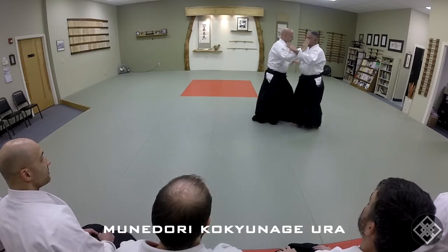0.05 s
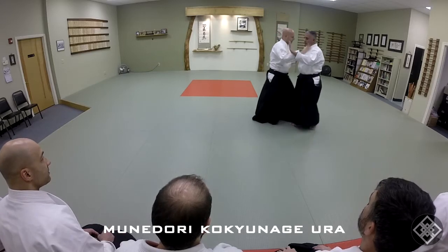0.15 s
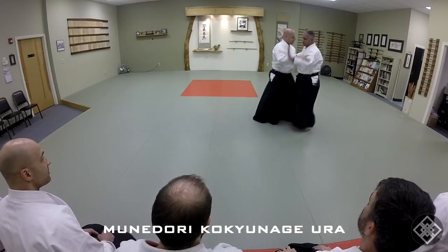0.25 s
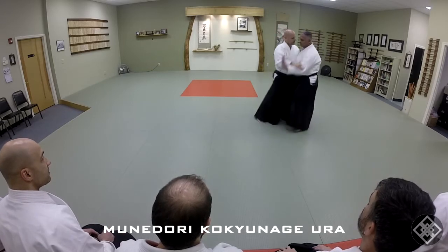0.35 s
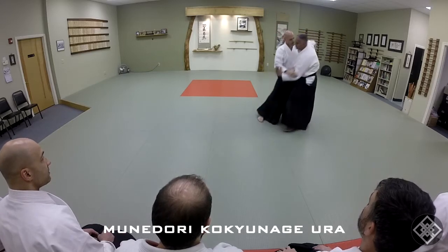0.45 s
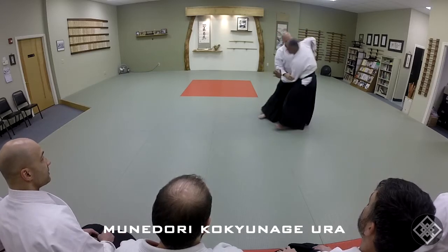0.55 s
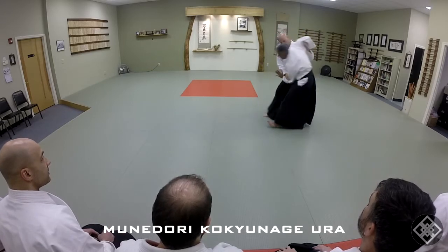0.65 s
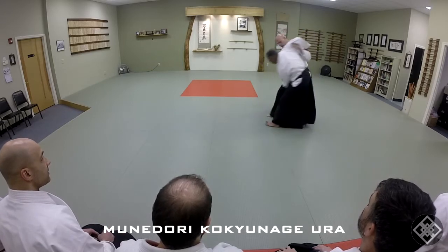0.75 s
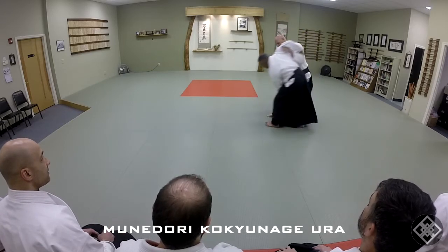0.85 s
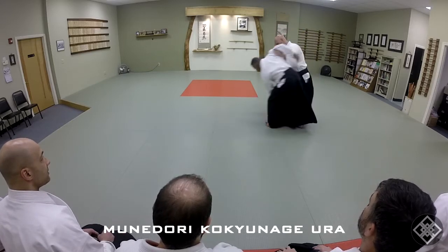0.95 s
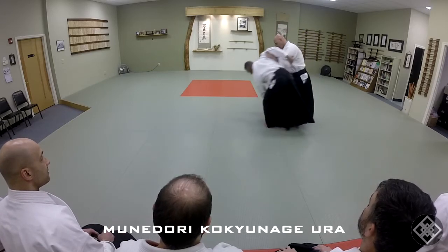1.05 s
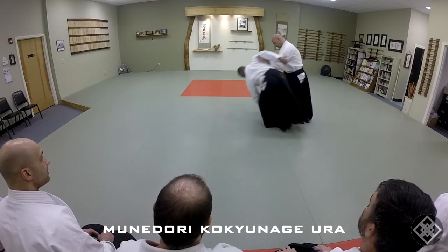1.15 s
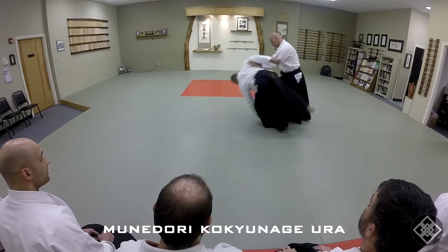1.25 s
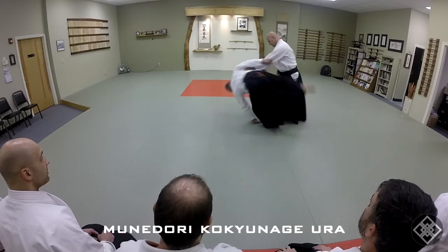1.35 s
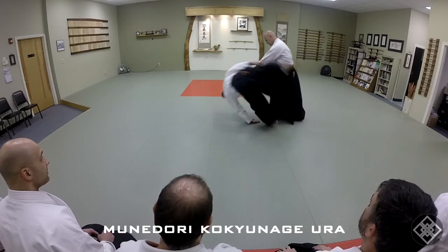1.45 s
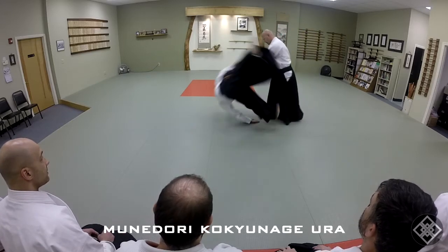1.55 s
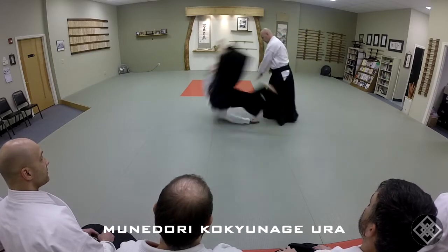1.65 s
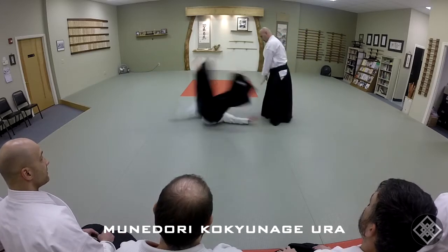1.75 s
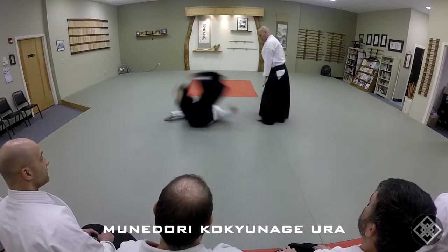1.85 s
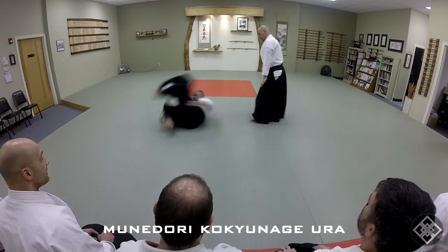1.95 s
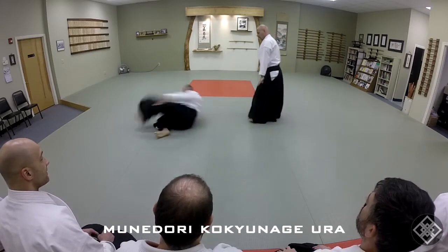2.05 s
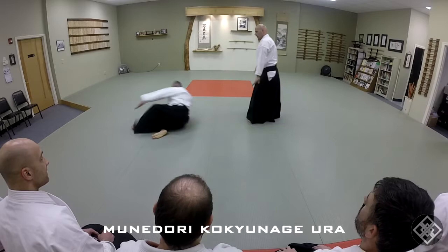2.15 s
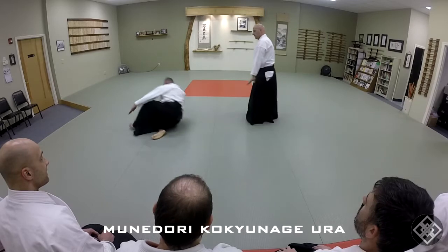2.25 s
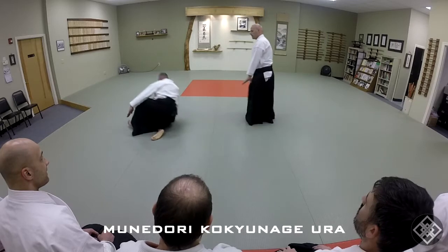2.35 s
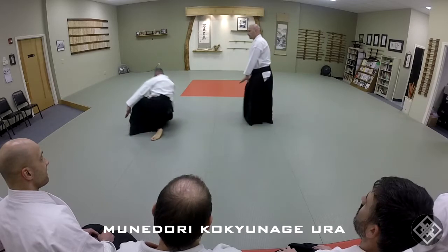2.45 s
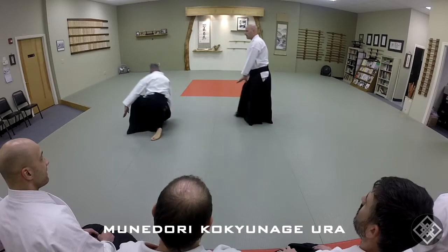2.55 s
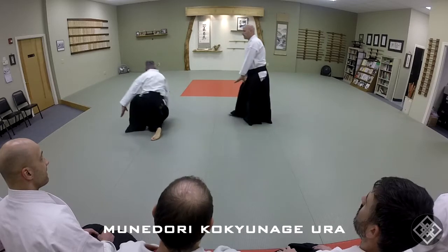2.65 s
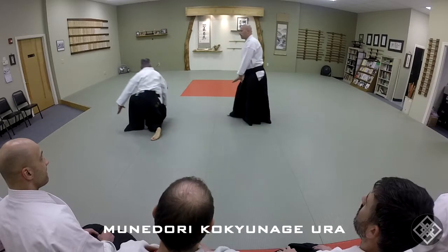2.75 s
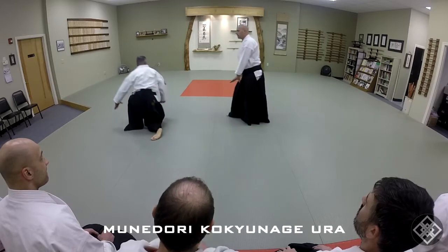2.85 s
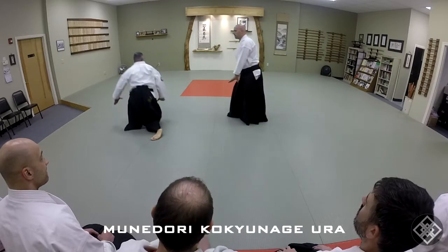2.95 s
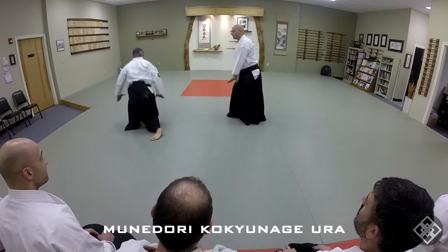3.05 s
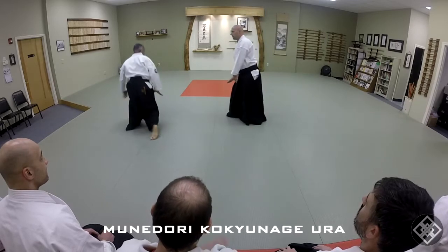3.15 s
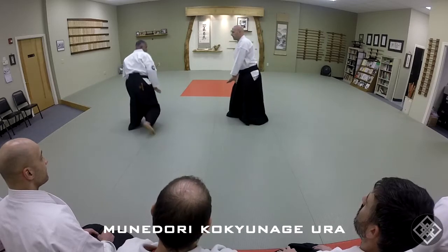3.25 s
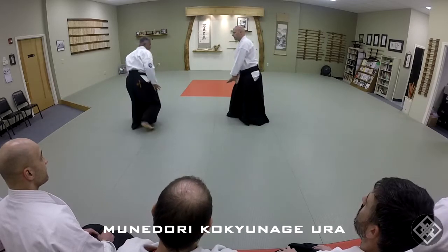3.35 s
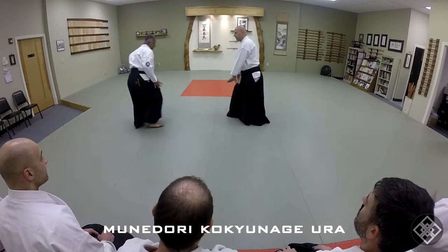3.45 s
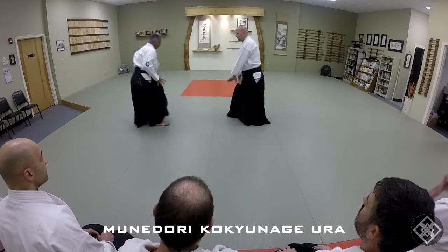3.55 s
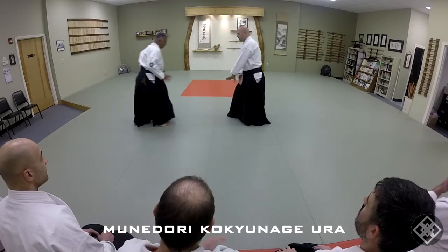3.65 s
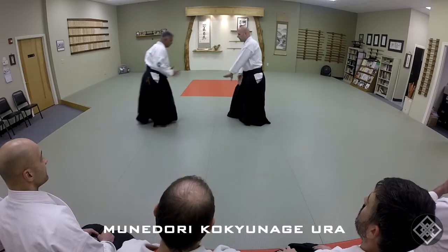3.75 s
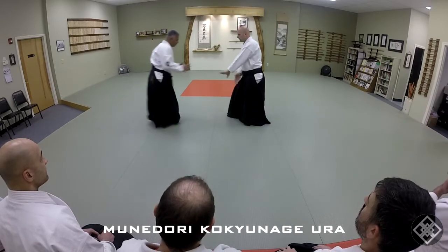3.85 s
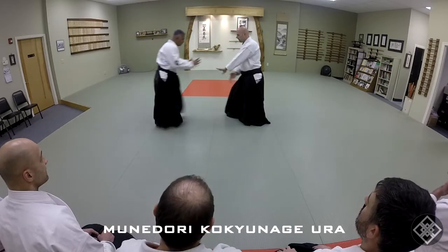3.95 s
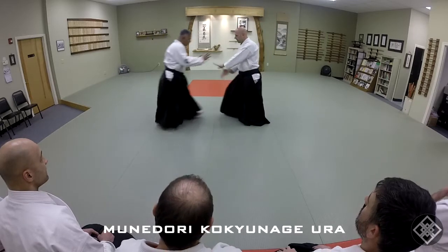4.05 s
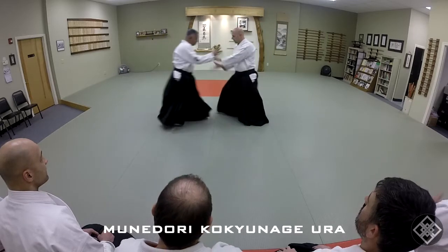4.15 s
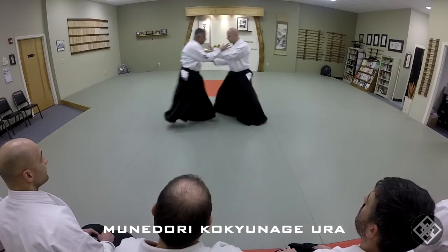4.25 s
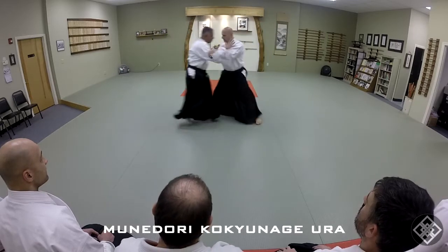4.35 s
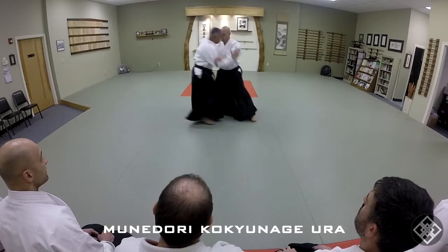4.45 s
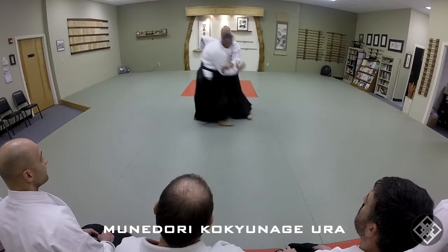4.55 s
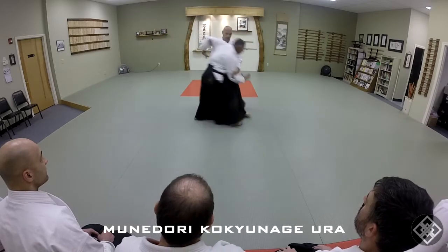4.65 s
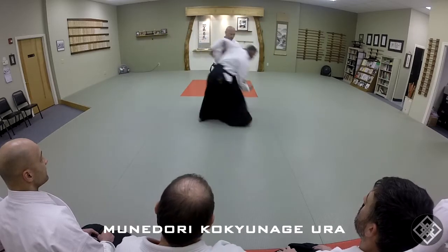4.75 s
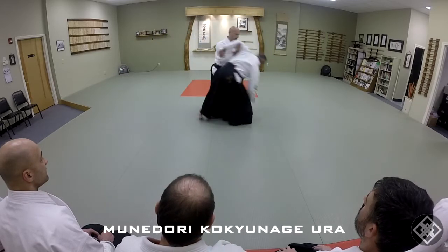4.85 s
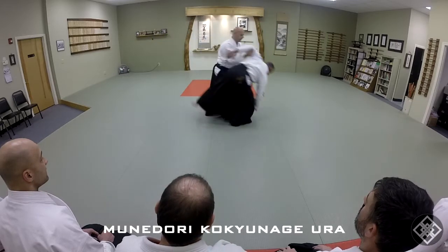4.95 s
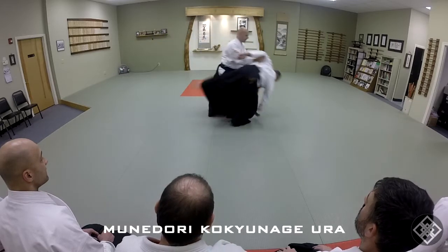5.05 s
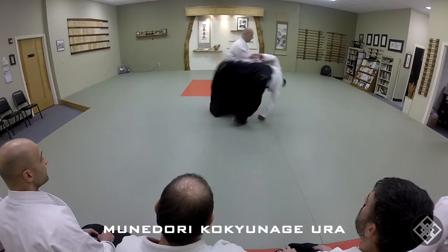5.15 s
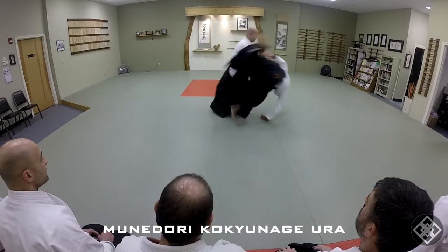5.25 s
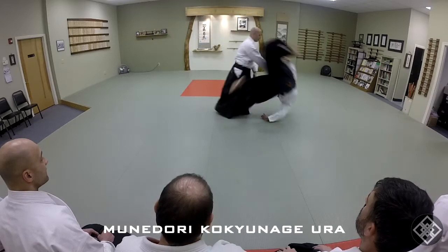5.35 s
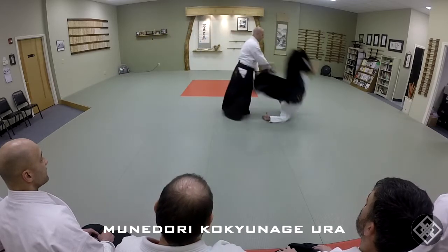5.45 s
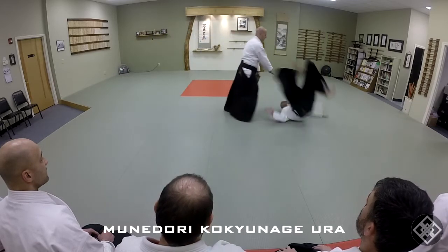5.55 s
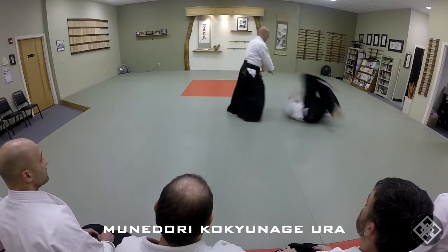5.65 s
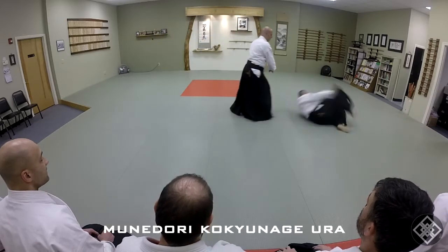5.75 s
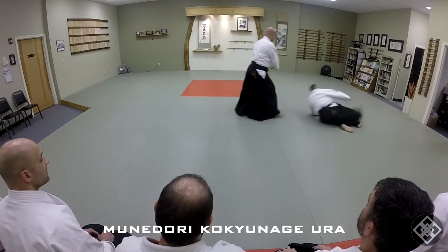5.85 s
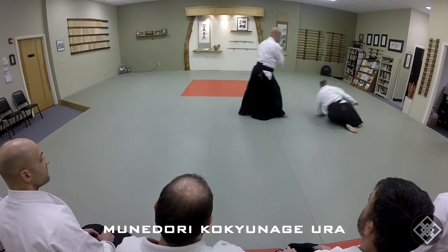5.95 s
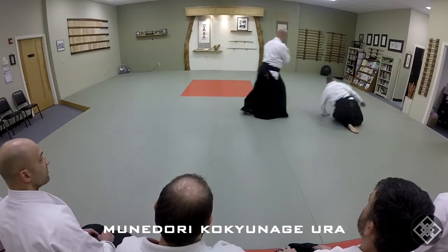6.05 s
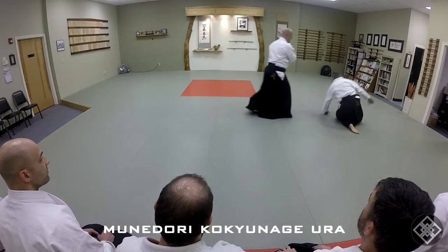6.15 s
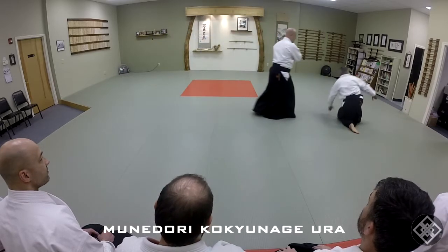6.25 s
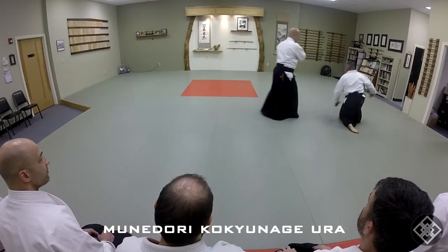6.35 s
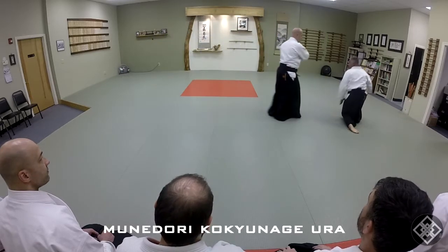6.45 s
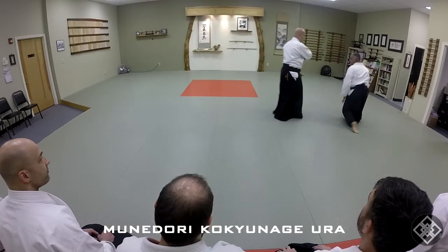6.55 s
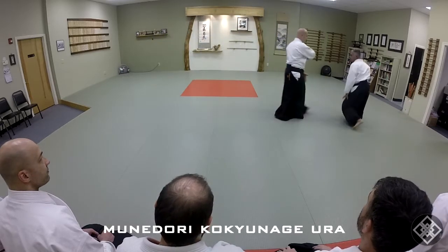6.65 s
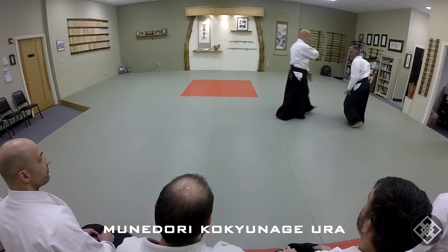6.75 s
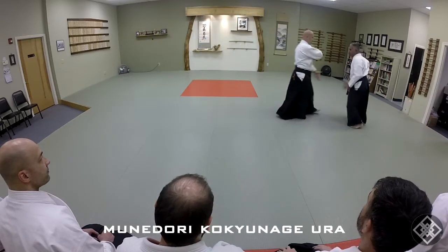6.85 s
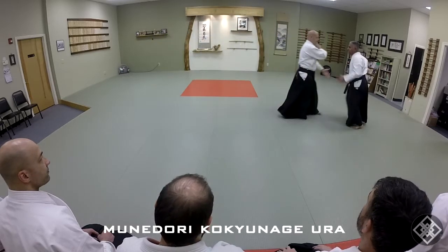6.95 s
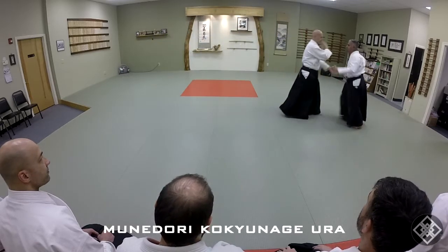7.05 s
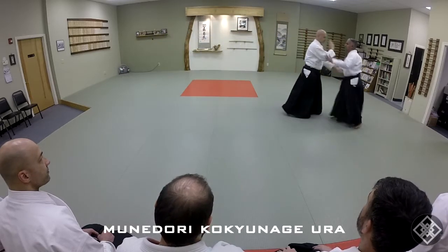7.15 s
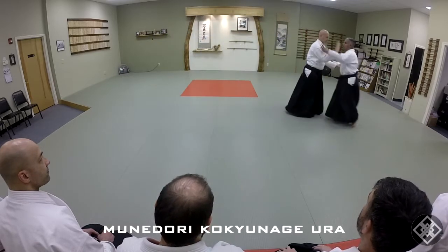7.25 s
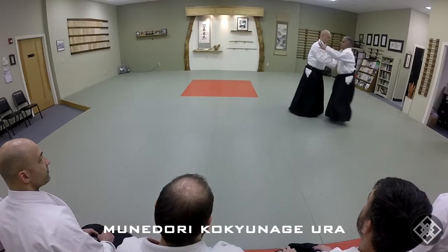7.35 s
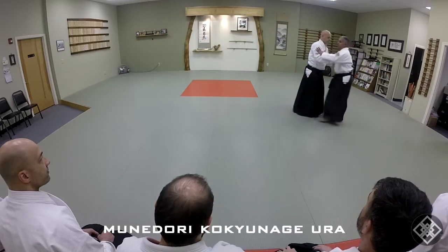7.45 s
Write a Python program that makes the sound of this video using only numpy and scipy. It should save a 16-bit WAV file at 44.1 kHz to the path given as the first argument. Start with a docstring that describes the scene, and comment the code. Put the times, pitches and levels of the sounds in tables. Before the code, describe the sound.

Two heavy falls thud on a training mat and roll out, amid hand grabs, barefoot scuffs and low ventilation noise.

```python
"""Two throws in a martial arts hall

A few metres from the microphone, a body slaps onto a padded mat and rolls out; the sprung floor booms.
Between the falls bare feet scuff, cotton jackets rustle and hands grab, over the ventilation.
The hall rings for under a second, and both landings overload the microphone."""
import sys
import numpy as np
from scipy import signal
from scipy.fft import rfft, irfft, next_fast_len
from scipy.io import wavfile

SR = 44100
rng = np.random.default_rng(int(sys.argv[2]) if len(sys.argv) > 2 else 0)


def to_wav(s):
    """Save 16-bit WAV."""
    ch = np.atleast_2d(s).T  # columns
    pcm = np.round(np.clip(ch, -1, 1) * 32767)  # PCM
    wavfile.write(sys.argv[1], SR, pcm.astype(np.int16))


N = 330249
TIME = np.arange(N) / SR

# air squeezed from under the mat cover: (frequency [Hz], relative level [dB])
MAT_AIR_SPECTRUM = [(60, -18), (150, 0.5), (250, -6), (330, 4), (400, -2.5), (490, -1), (660, -3.5),
                    (1000, -11), (1500, -13.5), (2500, -25.5), (5000, -32), (9000, -46), (15000, -83)]
# a thrown body lands: (time [s], thud [dB], contact [s], slap [dB], crack [dB], first gap between body
# parts [s], slap and crack lost per part [dB], roll-out thud [dB], dip in the room tone [dB])
LANDINGS = [(1.8636, -7.5, 0.0028, 1.5, -9, .0098, 1.15, -18.5, -6),
            (5.659, 1, 0.0039, 2, -2, .0098, 4, -9, -1.5)]


def from_db(db):
    """Decibels to gain."""
    return 10 ** (np.asarray(db) / 20)


def at_hz(points, hz):
    """Read a table on a log-frequency axis."""
    known_hz, values = np.transpose(points)
    return np.interp(np.log(np.maximum(hz, 1)), np.log(known_hz), values)


def coloured(x, spectrum):
    """Give a steady signal a spectrum; rms 1."""
    size = next_fast_len(N)
    gain = from_db(at_hz(spectrum, np.arange(size // 2 + 1) * SR / size))
    shaped = irfft(rfft(x, size) * gain, size)[:N]
    return shaped / shaped.std()


def noise(spectrum):
    """Smooth noise of a given colour; rms 1."""
    return coloured(rng.standard_normal(N), spectrum)


def ring(force, hz, t60):
    """One resonance: a unit impulse starts a sine of height 1 that falls 60 dB in t60 seconds."""
    radius, angle = from_db(-60 / (t60 * SR)), 2 * np.pi * hz / SR
    return signal.lfilter([0, np.sin(angle)], [1, -2 * radius * np.cos(angle), radius ** 2], force + 1e-18)


def burst(attack_s, decay_s):
    """A quick rise and an exponential fall."""
    t = TIME[:SR // 2]
    return (1 - np.exp(-t / attack_s)) * np.exp(-t / decay_s)


def add(track, s, piece):
    """Mix a piece into a track from time s."""
    start = int(s * SR)
    track[start:start + len(piece)] += piece[:max(N - start, 0)]


def ventilation(air_db, drone_db, hum_db):
    """Room tone: a fan hums and drones in its duct, with rumble and hiss; it dips after each fall."""
    # moving air in the hall: (frequency [Hz], relative level [dB])
    air_spectrum = [(15, -25), (28, -3.5), (43, -5.5), (58, -1), (80, -7), (125, -7), (200, -10.5),
                    (270, -11.5), (380, -10.5), (750, -14.5), (1100, -19.5), (2500, -29), (6000, -37),
                    (10000, -46.5), (15000, -51), (16000, -65)]
    # the fan motor: (frequency [Hz], relative level [dB])
    motor_tones = [(59.2, -37.5)]
    drone = ring(rng.standard_normal(N), hz=57.6, t60=0.96)
    hum = sum(from_db(db) * np.sqrt(2) * np.sin(2 * np.pi * (hz * TIME + rng.random()))
              for hz, db in motor_tones)
    air = from_db(air_db) * noise(air_spectrum)
    delay_s, half_s = 0.59, 0.24
    dips_db = sum(db * np.exp(-((TIME - s - delay_s) / half_s) ** 2) for s, *_, db in LANDINGS)
    return from_db(dips_db) * (air + from_db(drone_db) * drone / drone.std() + from_db(hum_db) * hum)


def hall(x, build_up_s):
    """In each half octave, energy builds up in the hall and dies away as a wash of countless echoes."""
    # the hall's reverberation: (frequency [Hz], time to fall 60 dB [s])
    decay_times = [(50, 0.85), (150, 0.81), (400, 0.8), (1000, 0.3), (4000, 0.58), (12000, 0.27)]
    echoes, white = np.zeros(N), rng.standard_normal((2, N))
    edges_hz = 28 * 2 ** (np.arange(20) / 2)
    rise = np.exp(-1 / (build_up_s * SR))
    for k, (low, high) in enumerate(zip(edges_hz, edges_hz[1:])):
        band = signal.butter(2, [low, high], "band", fs=SR, output="sos")
        t60 = at_hz(decay_times, np.sqrt(low * high))
        fall = from_db(-60 / (t60 * SR)) ** 2   # squared for energy
        power = signal.sosfilt(band, x) ** 2 + 1e-18
        energy = signal.lfilter([(1 - rise) * (1 - fall)], [1, -rise - fall, rise * fall], power)
        wash = signal.sosfilt(band, white[k % 2])
        echoes += np.sqrt(np.abs(energy)) * wash / wash.std()
    return echoes


def grappling_effort(rise_db_per_s=4.5, edge_s=0.05, uneven_db=1, tugs_per_s=7):
    """The pair close in and wrestle; each bout builds in uneven tugs."""
    # bouts of wrestling: (start [s], end [s], effort at the end [dB])
    grapples = [(0.706, 2.2, -35.5), (3.87, 6.0, -36), (6.3, 7.598, -40)]
    build = np.zeros(N)
    for start, end, db in grapples:
        fade = np.clip(np.minimum(TIME - start, end - TIME) / edge_s, 0, 1)
        build += fade * from_db(db + rise_db_per_s * (TIME - end))
    tugs_db = uneven_db * rng.standard_normal(200)
    return build * from_db(np.interp(TIME * tugs_per_s, np.arange(len(tugs_db)), tugs_db))


def strokes(rows):
    """Sliding speed that swells and fades with each stroke."""
    return sum(from_db(db) * np.exp(-np.minimum(((TIME - s) / half_s) ** 2, 20)) for s, half_s, db in rows)


def rubbing(speed, spectrum, slips_per_s, spread_db):
    """Dense tiny slips of uneven size, as loud as the sliding is fast."""
    sizes = from_db(spread_db * np.minimum(rng.exponential(1, N), 5)) * rng.choice([-1, 1], N)
    slips = sizes * (rng.random(N) < slips_per_s / SR)
    return speed * coloured(slips, spectrum)


def jackets(effort, rustle_db=-16):
    """Cotton rubs on cotton: a rustle that follows the effort, a swish with each wide swing."""
    # swings of a jacket or trouser leg, and a soft slide of a foot near 4.1 s: (middle [s], half length [s],
    # level [dB])
    swishes = [(.055, 0.011, -45), (.79, .07, -48), (1.47, 0.12, -48), (2.11, 0.016, -35.5),
               (2.64, 0.082, -52), (3.59, 0.062, -43.5), (4.12, 0.096, -49), (4.2, 0.0027, -34.5),
               (4.36, 0.065, -45.5), (4.73, 0.14, -52), (5.30, 0.035, -47), (5.835, 0.013, -30),
               (5.93, 0.015, -28.5), (6.36, 0.071, -53), (7.215, 0.019, -37)]
    # rubbing cotton: (frequency [Hz], relative level [dB])
    cotton_spectrum = [(300, 14.5), (1500, 7.5), (3000, 7.5), (6000, 2.5), (9000, -4.5), (13000, -8.5),
                       (15000, -21)]
    speed = strokes(swishes) + from_db(rustle_db) * effort
    return rubbing(speed, cotton_spectrum, slips_per_s=3500, spread_db=1.5)


def bare_feet(effort, shuffle_db=-3):
    """Soles rasp across the cover, and shifting weight presses air from the mat."""
    # sliding soles: (middle [s], half length [s], level [dB])
    scuffs = [(3.284, 0.013, -34), (3.310, 0.0093, -48), (3.341, 0.019, -29), (3.372, 0.012, -49),
              (4.06, 0.027, -48), (4.135, 0.028, -60), (6.677, 0.0074, -38.5), (6.712, 0.024, -36.5)]
    # skin rasping on the cover: (frequency [Hz], relative level [dB])
    sole_spectrum = [(500, -49), (1100, 0), (1700, 8), (3500, 5.5), (7500, 1), (10000, -14), (15000, -15)]
    rasp = rubbing(strokes(scuffs), sole_spectrum, slips_per_s=2400, spread_db=1.1)
    return rasp + from_db(shuffle_db) * effort * noise(MAT_AIR_SPECTRUM)


def hand_grabs():
    """A cupped palm on cloth gives a short, hollow smack with no bass."""
    # hands catching arms and thick cotton: (time [s], level [dB], decay [s])
    grabs = [(4.33, -29, 0.022), (4.4077, -14, 0.0081), (5.561, -26, 0.038), (7.242, -33, 0.0064),
             (7.402, -23.5, 0.0069)]
    # the hollow of the palm: (frequency [Hz], relative level [dB])
    palm_spectrum = [(150, -22), (330, 7), (550, 7.5), (1050, 9.5), (1450, -2.5), (1800, -5), (3000, -18),
                     (6000, -19), (9000, -42), (14000, -54)]
    smack = np.zeros(N)
    for s, db, decay_s in grabs:
        add(smack, s, from_db(db) * burst(attack_s=0.00081, decay_s=decay_s))
    return smack * noise(palm_spectrum)


def mat_contacts():
    """Every blow on the mat, in the columns of touches plus (slap decay [s], crack decay [s])."""
    # a hand, knee or foot comes down: (time [s], thud [dB], contact [s], slap [dB], crack [dB])
    touches = [ (1.7677, -44, 0.0042, -16, -30), (1.781, -16, 0.0026, -16, -58),
               (1.837, -24, .004, -18, -20), (2.185, -23, 0.0059, -37, -48),
               (2.208, -24, 0.0026, -24, -14.5), (2.24, -29, 0.0076, -23.5, -28),
               (5.46, -43, 0.0035, -29, -50), (5.59, -16.5, 0.0073, -16, -56),
               (5.6387, -14, 0.0031, -18.5, -25), (5.823, -6.5, 0.0075, -16.5, -28),
               (5.917, -6.5, .010, -19.5, -26), (5.96, -11, 0.007, -21, -32),
               (7.245, -23.5, 0.0093, -38, -42)]
    landing_decays_s, roll_decays_s, touch_decays_s = (0.0086, 0.0029), (0.028, 0.0012), (0.013, 0.0012)
    thud_loss_db, slowing = 1.75, 1.2
    roll_start_s, roll_gap_s, roll_uneven_s = 0.095, 0.053, 0.0053
    roll_loss_db, roll_contact_s, slap_under_thud_db = 1.37, 0.0075, 11.5
    rows = []
    for s, thud_db, contact_s, slap_db, crack_db, gap_s, loss_db, roll_db, _ in LANDINGS:
        for k in range(4):   # arm, shoulder, back and hip land in turn, weaker and ever further apart
            rows.append((s + gap_s * k ** slowing, thud_db - k * thud_loss_db, contact_s,
                         slap_db - k * loss_db, crack_db - k * loss_db, *landing_decays_s))
        for k in range(6):   # the body rolls out in soft, fading bumps with no crack
            bump_s = s + roll_start_s + k * roll_gap_s + roll_uneven_s * rng.standard_normal()
            bump_db = roll_db - k * roll_loss_db
            rows.append((bump_s, bump_db, roll_contact_s,
                         bump_db - slap_under_thud_db, -np.inf, *roll_decays_s))
    return rows + [(*touch, *touch_decays_s) for touch in touches]


def floor_boom(contacts, radiation_hz=40):
    """Each weight pushes the floor for a moment; a long, soft push reaches only the lowest modes."""
    # the sprung floor: (frequency [Hz], relative level [dB], time to fall 60 dB [s])
    floor_modes = [(34.6, -10.5, 1), (55, -25, 0.31), (82.5, -2.5, 0.3), (103.1, -8, 0.46),
                   (132.65, -3, 0.36), (173.2, -3.5, 0.19), (212.2, -6, 0.34), (331, 0, 0.22),
                   (409, -10, 0.35), (490, -25, 0.13)]
    force = np.zeros(N)
    for s, thud_db, contact_s, *_ in contacts:
        push = np.sin(np.pi * np.minimum(TIME[:SR // 10] / contact_s, 1)) ** 2
        add(force, s, from_db(thud_db) * push / push.sum())
    motion = sum(from_db(db) * ring(force, hz, t60) for hz, db, t60 in floor_modes)
    # slow sagging moves the air aside and hardly radiates
    return signal.sosfilt(signal.butter(2, radiation_hz, "high", fs=SR, output="sos"), motion)


def mat_slaps(contacts):
    """Skin cracks on the cover, and the trapped air bursts out more slowly."""
    # skin and cloth striking the cover: (frequency [Hz], relative level [dB])
    crack_spectrum = [(600, -37), (1400, 14.5), (3000, 11), (5000, 9), (8000, 2), (15000, -9)]
    slap, crack = np.zeros(N), np.zeros(N)
    for s, _, _, slap_db, crack_db, slap_s, crack_s in contacts:
        add(slap, s, from_db(slap_db) * burst(attack_s=0.00075, decay_s=slap_s))
        add(crack, s, from_db(crack_db) * burst(attack_s=0.000067, decay_s=crack_s))
    return slap * noise(MAT_AIR_SPECTRUM) + crack * noise(crack_spectrum)


def scene():
    """The pair work a few metres from the microphone, so much of their sound comes by way of the hall."""
    contacts, effort = mat_contacts(), grappling_effort()
    boom, slaps, hands = floor_boom(contacts), mat_slaps(contacts), hand_grabs()
    scuffle = bare_feet(effort) + jackets(effort)
    direct = boom + slaps + hands + scuffle
    into_hall = (from_db(-2.5) * boom + from_db(-3.5) * slaps
                 + from_db(-1.5) * hands + from_db(-2) * scuffle)
    room_tone = ventilation(air_db=-35, drone_db=-46.5, hum_db=-7)
    return (room_tone + direct + hall(into_hall, build_up_s=0.0011))[None]


def record(dry, ceiling=0.97, cutoff_hz=15500):
    """One microphone: the landings clip flat, and the highest treble is cut off steeply."""
    clipped = np.clip(dry, -ceiling, ceiling)
    return signal.sosfilt(signal.ellip(8, 0.1, 70, cutoff_hz, fs=SR, output="sos"), clipped)


dry = scene()
out = record(dry)
to_wav(out)
```